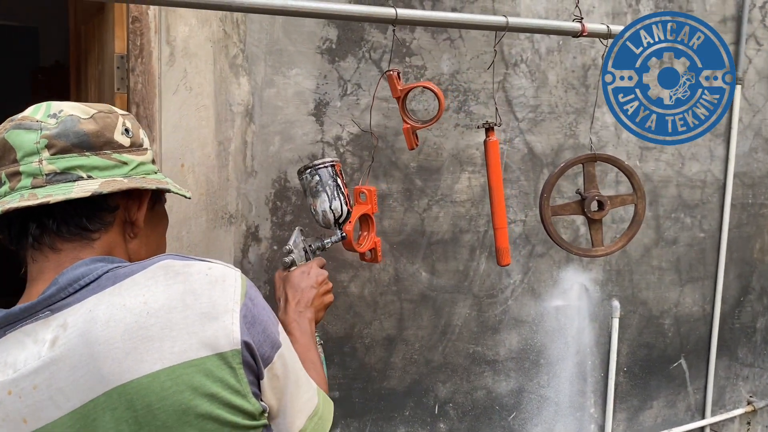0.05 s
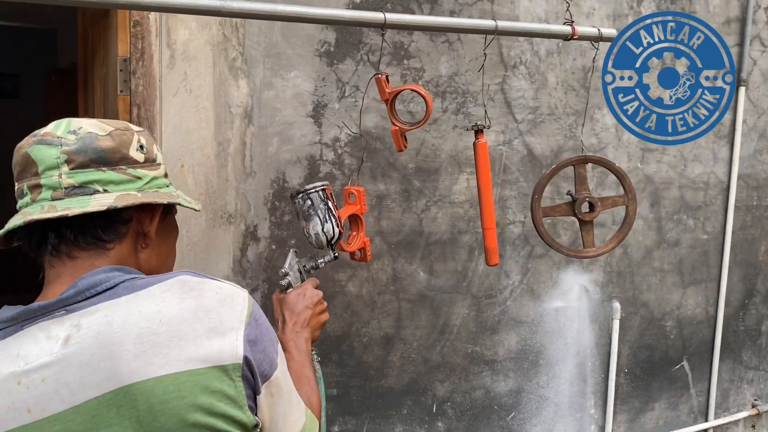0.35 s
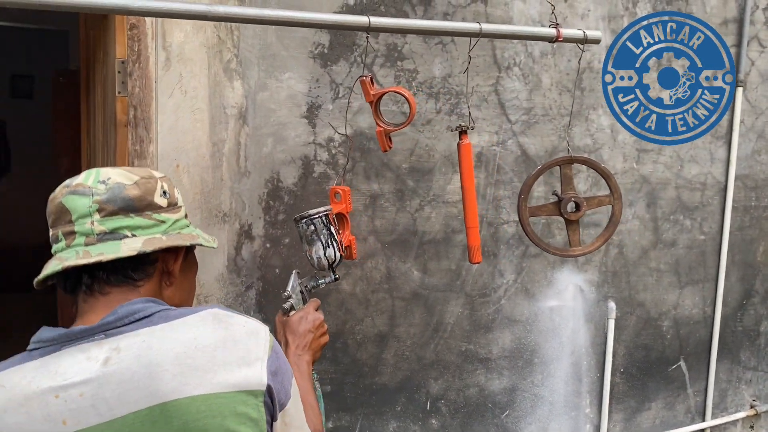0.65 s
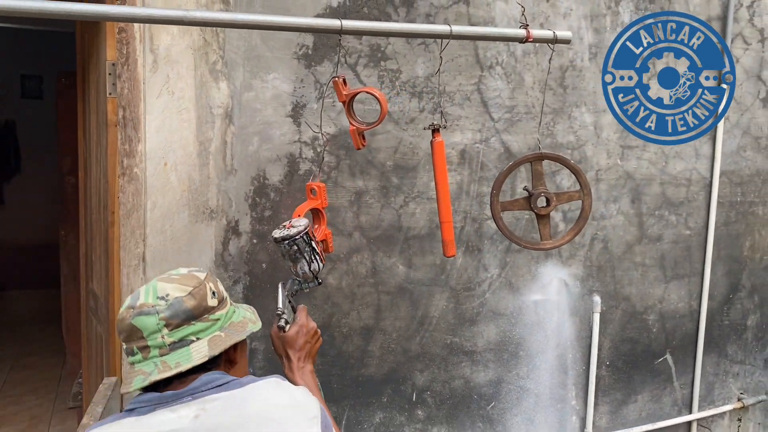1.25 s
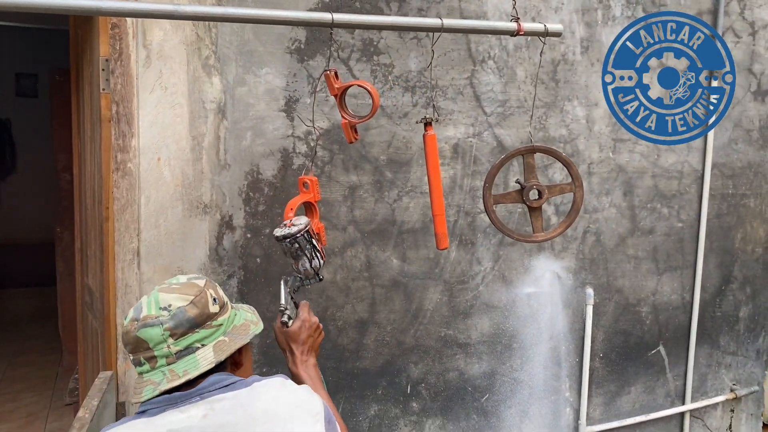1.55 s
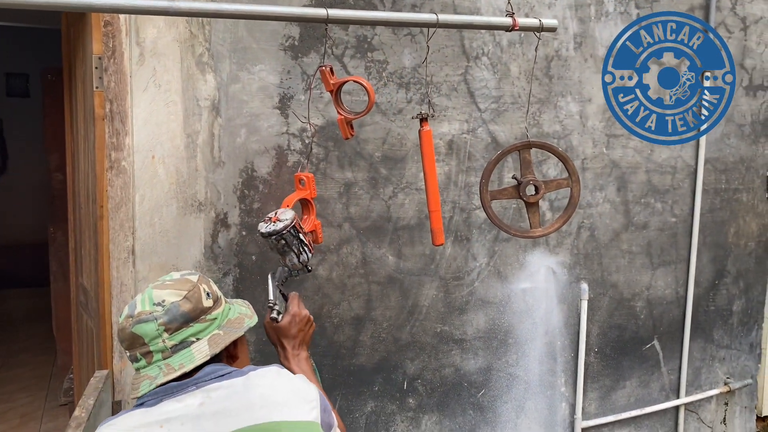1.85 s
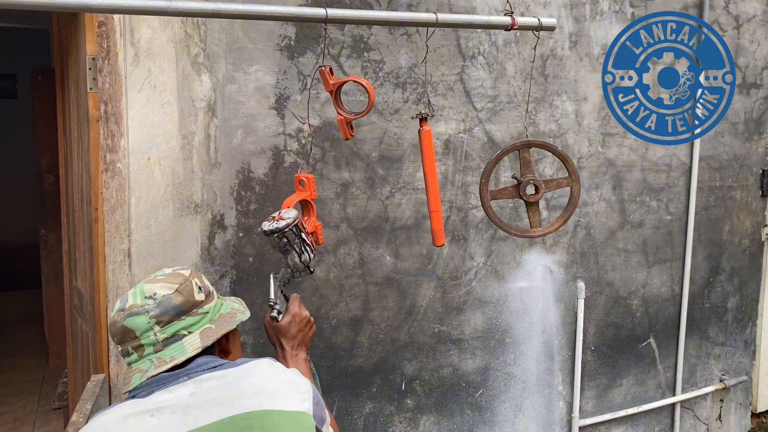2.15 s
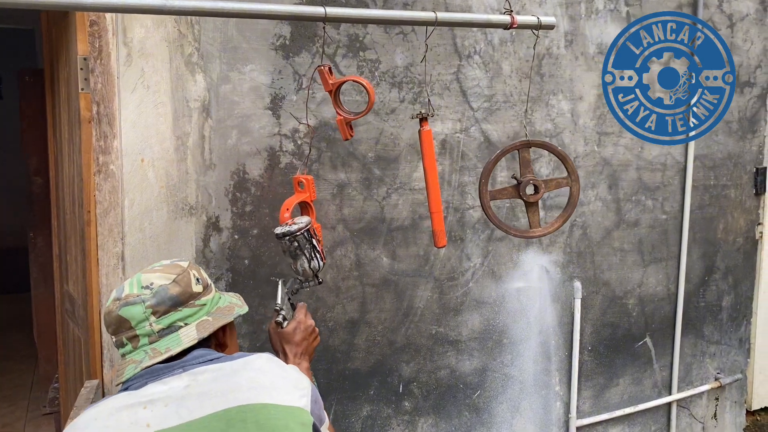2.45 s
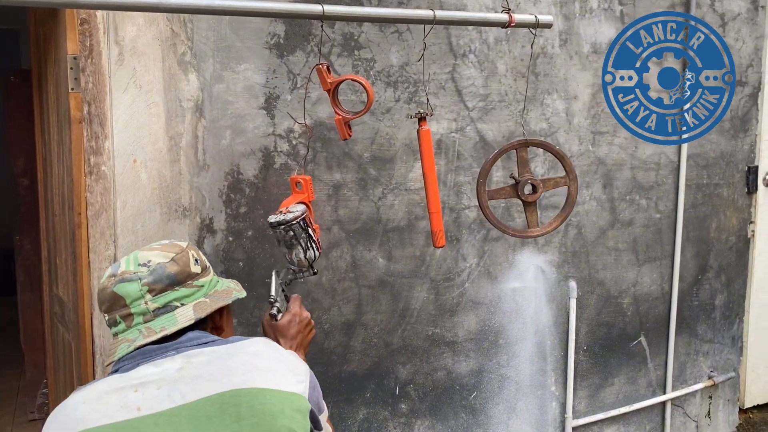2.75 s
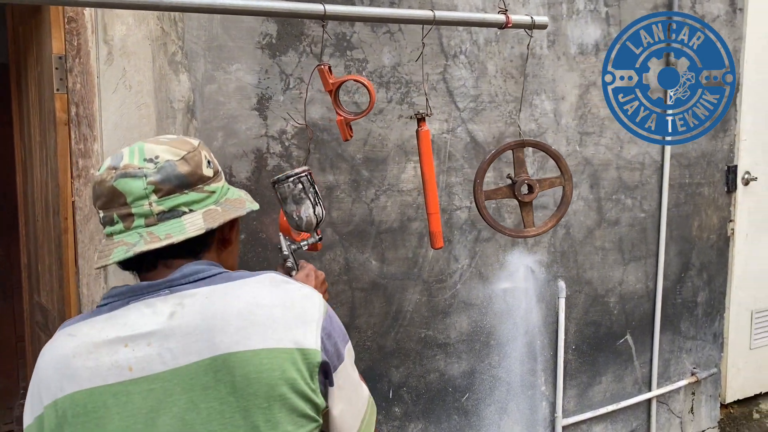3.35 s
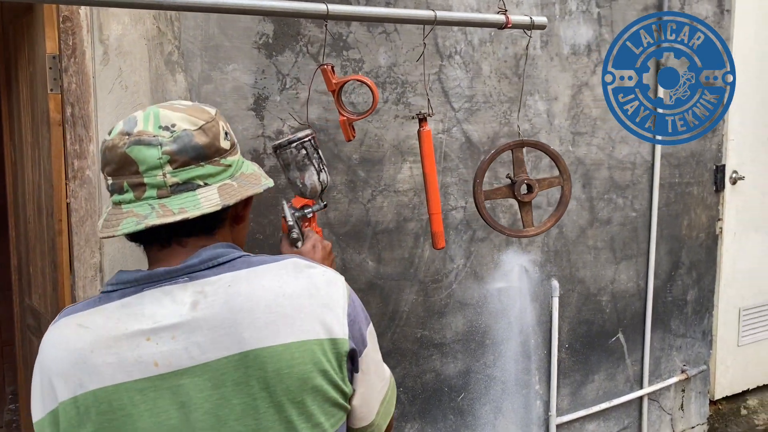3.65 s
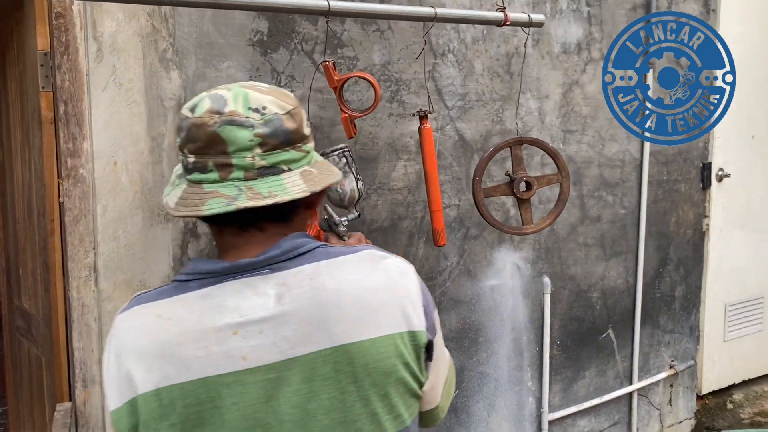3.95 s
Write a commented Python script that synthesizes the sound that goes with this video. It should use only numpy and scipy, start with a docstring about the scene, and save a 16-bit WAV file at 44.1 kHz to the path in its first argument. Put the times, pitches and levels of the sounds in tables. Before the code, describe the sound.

An air compressor drones steadily while a spray gun hisses in repeated sweeps.

```python
"""From the start an air compressor runs in a walled yard, droning on the harmonics of its stroke rate.
Its valves chuff once a turn and its metal parts ring, while a spray gun hisses over parts hung on a wall,
louder with each sweep. The overtones swell and fade as the microphone drifts about.
At about 1.4 s the pump labours for a second, slowing slightly and whining; then it runs on steadily."""
import sys
import numpy as np
from scipy import signal
from scipy.fft import rfft, irfft
from scipy.io import wavfile
from scipy.ndimage import map_coordinates

SR = 44100
rng = np.random.default_rng(int(sys.argv[2]) if len(sys.argv) > 2 else 0)


def unload_audio(sound):
    """Save the sound as a 16-bit wav file, at the path given as the first command line argument."""
    columns = np.transpose(np.atleast_2d(sound))
    # keep every value between -1 and 1, then stretch to whole-number steps
    steps = np.round(np.clip(columns, -1, 1) * 32767)
    wavfile.write(sys.argv[1], SR, steps.astype(np.int16))


N = 176400

# Speed of the pump. Each row: time in seconds, strokes per second.
STROKE_RATE = [(0, 43.76), (1.3, 43.76), (1.45, 43.54), (1.95, 43.57), (2.55, 43.74), (4, 43.72)]
# Line spectrum of the drone. Each entry: relative level in dB of harmonic 1, 2, 3 and so on.
DRONE_LEVELS = [-18.5, 0, -4, -12, -5.5, -19, -2.5, -3.5, -9, -11.5, -10.5, -4, -12, -4, -7, -10, -19, -16,
                -18.5, -15, -7.5, -22, -19, -19.5, -20, -21.5, -19, -30, -17, -23.5, -38.5, -24, -28.5, -28,
                -25.5, -28.5, -34, -21.5, -38, -25, -30, -39.5, -29, -34, -34]


def undb(db):
    """Amplitude grows tenfold for every 20 dB."""
    return 10 ** (np.asarray(db) / 20)


def curve(rows):
    """Linear interpolation of (seconds, value) rows gives a value for every sample."""
    return np.interp(np.arange(N) / SR, *np.array(rows, float).T)


def gain_at(rows, hz):
    """Interpolation of (Hz, dB) rows over log frequency gives an amplitude gain."""
    row_hz, db = np.array(rows, float).T
    return undb(np.interp(np.log(hz + 1e-3), np.log(row_hz), db))


def walk(per_s):
    """A spline through random knots gives a smooth fluctuation with a spread near 1."""
    knots = rng.standard_normal(1024)
    positions = np.linspace(0, per_s * N / SR, 800) + 8 * rng.random()
    coarse = map_coordinates(knots, [positions], mode="wrap")
    return np.interp(np.arange(N) * (799 / N), np.arange(800), coarse)


def wander(per_s):
    """Rayleigh fading: a smooth random complex gain of rms near 1, one value per 100 samples."""
    positions = np.linspace(0, per_s * N / SR, N // 100 + 1) + rng.random() + 2
    real, imag = (map_coordinates(rng.standard_normal(256), [positions], mode="wrap") for _ in range(2))
    return (real + 1j * imag) / np.sqrt(2)


def yard_noise(hz, shape, coherence, ripple_db=3, ripple_hz=45.4, left_lag_s=.000265):
    """Interference of wall echoes ripples the spectrum of partly coherent stereo noise of rms 1."""
    def rippled():
        spectrum = rfft(rng.standard_normal(N)) * shape
        ripple = np.interp(hz / ripple_hz, np.arange(4096), rng.standard_normal(4096))
        return spectrum * undb(ripple_db * ripple)
    shared, left, right = rippled(), rippled(), rippled()
    coherence = np.clip(coherence, 0, 1)
    direct, diffuse_gain = np.sqrt(coherence) * shared, np.sqrt(1 - coherence)
    delayed = direct * np.exp(-2j * np.pi * hz * left_lag_s)
    pair = irfft(np.array([delayed + diffuse_gain * left, direct + diffuse_gain * right]), N)
    return pair / pair.std()


def echo_phases():
    """Echoes spread each stroke over the turn: of many random phase sets, the least throbbing is used."""
    def throb(band, apart):
        beats = np.sum(band[:, apart:] * band[:, :-apart].conj(), axis=1)
        return abs(beats / np.sum(abs(band) ** 2, axis=1)) ** 2
    phases = np.exp(2j * np.pi * rng.random((3000, 128)))
    tones = undb(DRONE_LEVELS) * phases[:, 1:len(DRONE_LEVELS) + 1]
    middle, upper = tones[:, 8:16], tones[:, 11:]
    total = throb(tones, 1) + throb(middle, 1) + throb(upper, 1) + throb(upper, 2) + throb(upper, 3)
    return phases[np.argmin(total)]


def multipath(tone, hz, reflected, steadier):
    """Multipath fading: a tone's share off the walls wanders in level and direction; it also flutters."""
    # Stereo width. Each row: frequency in Hz, side against middle in dB.
    width = [(60, -26), (130, -16), (220, -19), (320, -12), (440, 4), (525, 1), (610, 4), (700, 1.5),
             (950, -2), (1300, 3.5), (1600, 1), (1880, 8.5), (2300, 2.5), (4200, -13)]
    flutter = (.08 if steadier else .16) * min(hz / 885, 1) ** 2  # full depth above 885 Hz
    def arrival():
        path = np.sqrt(1 - reflected ** 2) + reflected * wander(per_s=1.55) + flutter * wander(per_s=24)
        path /= np.sqrt(np.mean(abs(path) ** 2))
        return np.repeat(path, 100)[:N] * tone
    mid = arrival().real
    side = arrival().imag * gain_at(width, hz)
    return np.array([mid + side, mid - side])


def pump(turns):
    """Periodic strokes radiate a harmonic series: a low drone, a buzz above it and a whine under load."""
    # Envelopes of single harmonics. Each row: time in seconds, relative level in dB.
    h11 = [(0.0, -41.5), (0.91, -61), (2.27, -42.5), (3.05, -45.5), (4.0, -39)]
    h12 = [(0.0, -37), (0.19, -40.5), (0.5, -47.5), (1.2, -37), (2.32, -39.5), (2.48, -42), (3.13, -40),
           (3.36, -37), (4.0, -32.5)]
    h14 = [(0.0, -33.5), (0.28, -34), (1.09, -46), (1.57, -36.5), (2.35, -39.5), (2.43, -48), (2.92, -44.5),
           (3.49, -39), (4.0, -47)]
    h15 = [(0.0, -38), (0.05, -71), (0.68, -48), (1.45, -38), (2.36, -39.5), (3.36, -55.5), (3.41, -45.5),
           (4.0, -39)]
    h16 = [(0, -66), (.6, -47), (1.2, -40), (1.55, -47), (2, -49), (2.5, -37.5), (3.1, -50), (4, -71)]
    h18 = [(0.0, -42), (1.28, -51.5), (1.85, -49), (2.16, -52), (3.92, -47), (4.0, -55)]
    h21 = [(0, -39.5), (.6, -45.5), (1.1, -42), (2.4, -42.5), (3, -42), (4, -41)]
    # The whine, the tones around it and two thin metallic overtones, with the same columns.
    whine = [(0, -59.5), (1.35, -62), (1.44, -47), (2.0, -46), (2.15, -44), (2.37, -43.5), (2.47, -55),
             (2.75, -60), (4, -60)]
    h41 = [(0, -64), (.9, -60), (1.6, -55), (2.3, -63), (2.7, -72), (4, -53)]
    h44 = [(0, -55), (1.35, -66), (1.75, -56), (2, -66), (2.25, -57), (2.6, -70), (4, -56)]
    h49 = [(0, -73), (.7, -64), (.95, -55.5), (1.5, -60), (1.8, -62), (4, -84)]
    h68 = [(0, -64), (1.35, -64), (1.55, -56.5), (2.1, -64), (2.5, -68), (4, -66)]
    metallic_low = [(0, -55), (.6, -46), (.92, -62), (1.3, -46.5), (1.5, -52), (2, -52.5), (2.5, -56),
                    (2.9, -50.5), (3.5, -54), (3.8, -54), (4, -72)]
    metallic_high = [(0, -61), (3, -61), (3.3, -54.5), (3.65, -53.5), (4, -64)]
    envelopes = {11: h11, 12: h12, 14: h14, 15: h15, 16: h16, 18: h18, 21: h21, 32: metallic_low,
                 41: h41, 44: h44, 49: h49, 52: whine, 68: h68, 109: metallic_high}
    # Swell of the deep hum. Each row: time in seconds, added level in dB.
    hum = [(0, 0.5), (.6, 0.5), (1.8, 0.15), (2.8, 1.2), (4, 0.5)]
    # Spectral envelope of the buzz. Each row: frequency in Hz, typical level of a harmonic in dB.
    buzz = [(1950, -75.5), (2200, -66.5), (2400, -75), (2950, -71.5), (3400, -73), (4100, -65), (4600, -72),
            (5300, -105)]
    # Tones that flutter half as much. Each entry: a harmonic number.
    steadier = (21, 32, 52)
    stroke_hz = np.mean(curve(STROKE_RATE))
    fundamental = np.exp(2j * np.pi * turns)
    phases = echo_phases()
    harmonic, sound = 1, 0
    for k in range(1, 120):
        harmonic, hz = harmonic * fundamental, k * stroke_hz
        reflected = min((hz / 1780) ** 1.4, .69)  # higher harmonics waver more
        if k in envelopes:
            gain, reflected = undb(curve(envelopes[k]) - .5), .1
        elif k <= len(DRONE_LEVELS):
            gain = undb(DRONE_LEVELS[k - 1] - 35.5 + (curve(hum) if hz < 260 else 0))
        else:
            gain = gain_at(buzz, hz) * undb(3.5 * rng.standard_normal())
        tone = np.sqrt(2) * gain * harmonic * phases[k]
        sound += multipath(tone, hz, reflected, k in steadier)
    return sound


def valves(turns, hz, coherence, chuff_db=4, chuff_turns=.15):
    """Turbulent air rushes through the valves, amplitude-modulated by one chuff in every turn."""
    # Spectrum of the rush. Each row: frequency in Hz, relative spectral density in dB.
    rush = [(25, -16), (45, 0.5), (100, 4), (220, -3), (400, 2), (750, -0.5), (1400, -3.5), (2400, -9.5),
            (3200, -14.5), (4500, -13.5), (5300, -11), (7000, -14.5), (16000, -90)]
    strength = undb(.7 * rng.standard_normal(400))[turns.astype(int)]
    pulse = np.exp(-((turns % 1 - .5) / chuff_turns) ** 2)
    chuff = 1 + (undb(chuff_db) - 1) * strength * pulse
    chuff /= np.sqrt(np.mean(chuff ** 2))
    return undb(-40) * yard_noise(hz, gain_at(rush, hz), coherence) * chuff


def resonance(hz, centre_hz, width_hz, coherence):
    """A resonance driven by noise passes a narrow band, here of Lorentzian shape."""
    return yard_noise(hz, 1 / (1 + (2 * (hz - centre_hz) / width_hz) ** 2), coherence)


def hollow_boom(hz, coherence):
    """A broad resonance booms; frequency shifting of its analytic signal makes the centre drift."""
    # Course of the boom. Each row: time in seconds, centre in Hz, level in dB.
    course = [(0, 606.6, -39), (.5, 588.3, -41.5), (1, 623, -48), (1.6, 612.9, -44), (2.099, 635.7, -39),
              (2.499, 674.6, -41), (3, 620.3, -46), (3.5, 585, -41), (4, 572.6, -37.5)]
    centre_hz = curve([(t, f) for t, f, db in course])
    gain = undb(curve([(t, db) for t, f, db in course]))
    drift = np.exp(2j * np.pi * np.cumsum(centre_hz - centre_hz.mean()) / SR)
    band = resonance(hz, centre_hz.mean(), width_hz=97, coherence=coherence)
    return gain * (signal.hilbert(band) * drift).real


def tank_and_pipes(hz, coherence):
    """Rushing air excites the normal modes of tank and pipes; one thin mode chirps and fades by turns."""
    # Envelope of the chirping mode. Each row: time in seconds, level in dB.
    chirp_levels = [(0, -65), (.15, -54), (.4, -57), (1.02, -50.5), (1.12, -65), (2.4, -56), (3, -71),
                    (4, -62)]
    # Steady modes. Each row: frequency in Hz, bandwidth in Hz, level in dB.
    modes = [(2273, 8.1, -53.5), (2478, 12, -59), (3990, 180, -61), (4125, 33, -63.5), (4810, 57, -59.5),
             (7110, 230, -61.5)]
    chirp = undb(curve(chirp_levels)) * resonance(hz, centre_hz=4050, width_hz=15, coherence=coherence)
    return chirp + sum(undb(db) * resonance(hz, centre, width, coherence) for centre, width, db in modes)


def spray_gun(hz, ramp_s=.1):
    """A turbulent jet of air and paint hisses, swelling as the gun is swept to and fro."""
    # Spectrum of the jet. Each row: frequency in Hz, relative spectral density in dB.
    hiss = [(800, -12), (6000, -5), (9500, -4), (14500, 0), (16000, -2)]
    # Sweeps of the gun. Each row: start in seconds, end in seconds, rise in dB.
    sweeps = [(.28, .59, 4), (1.14, 1.37, 4.2), (1.55, 1.9, 4.7), (2.09, 2.39, 3.9), (2.61, 2.8, 3.9),
              (3.24, 3.5, 3.9), (3.88, 4.1, 2.1)]
    t = np.arange(N) / SR
    swell_db = sum(db * np.clip(np.minimum(t - start, end - t) / ramp_s + .5, 0, 1)
                   for start, end, db in sweeps)
    return yard_noise(hz, gain_at(hiss, hz), coherence=.93) * undb(-47 + swell_db)


def scene():
    """The sources superpose; level differences place the compressor a little right, the gun in front."""
    # Coherence of the machine's noise. Each row: frequency in Hz, shared power in dB (capped at 0).
    shared_power = [(60, 2.3), (300, -3.5), (600, -10.5), (1200, -4), (4000, -3.5)]
    # Slight turning of the microphone. Each row: time in seconds, left against right in dB.
    turning = [(0, .5), (2.7, -.1), (3.2, 1.6), (4, 1.6)]
    # Balance of the machine. Each row: frequency in Hz, left against right in dB.
    balance = [(60, -0.3), (300, -3.1), (550, 0.5), (950, -5.5), (2200, 0), (4000, 1), (7000, 0)]
    hz = np.arange(N // 2 + 1) * SR / N
    stroke_hz = curve(STROKE_RATE)
    jitter_s = .00002 * walk(per_s=40)
    turns = 1 + np.cumsum(stroke_hz) / SR + jitter_s * stroke_hz
    coherence = gain_at(shared_power, hz) ** 2
    machine = pump(turns) + valves(turns, hz, coherence)
    machine += hollow_boom(hz, coherence) + tank_and_pipes(hz, coherence)
    machine *= undb(np.array([[1], [-1]]) * curve(turning) / 2)
    lean = np.sqrt(gain_at(balance, hz))
    machine = irfft(rfft(machine) * np.array([lean, 1 / lean]), N)
    return machine + spray_gun(hz)


def record(dry, cutoff_hz=15900):
    """An elliptic low-pass filter removes the highest treble."""
    return signal.sosfilt(signal.ellip(10, .2, 80, cutoff_hz, fs=SR, output="sos"), dry)


dry = scene()
out = record(dry)
unload_audio(out)
```